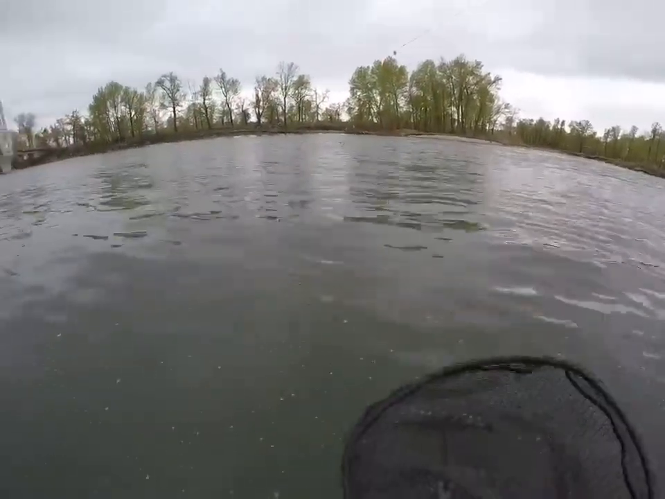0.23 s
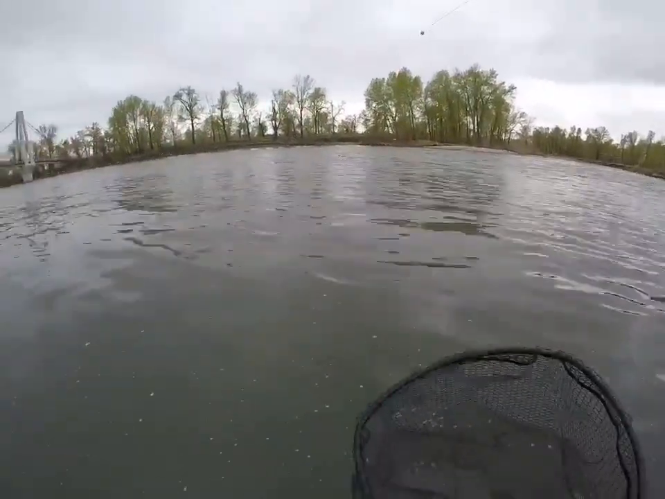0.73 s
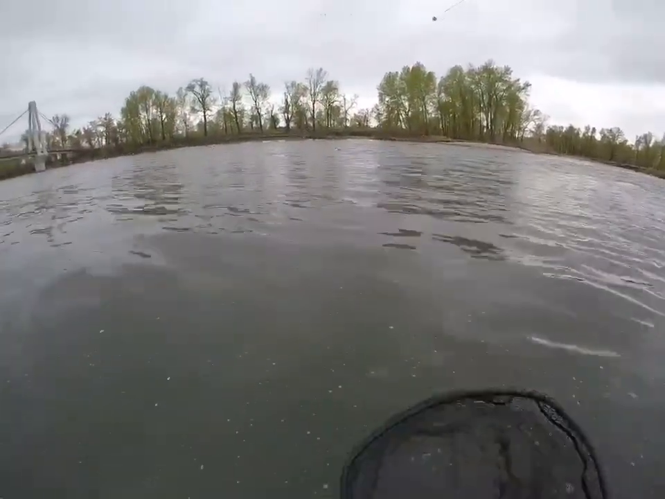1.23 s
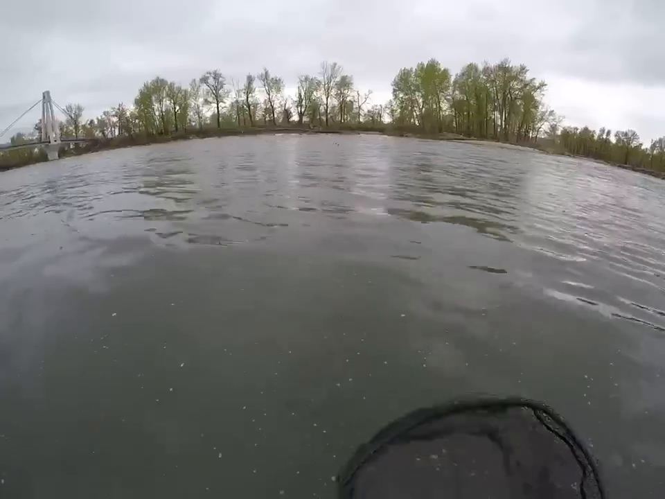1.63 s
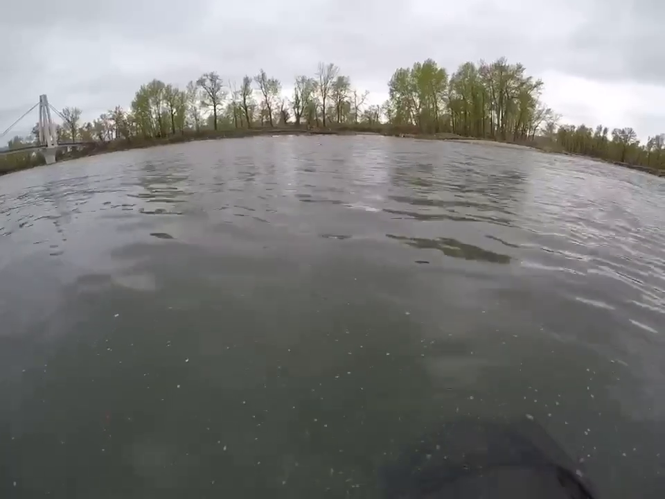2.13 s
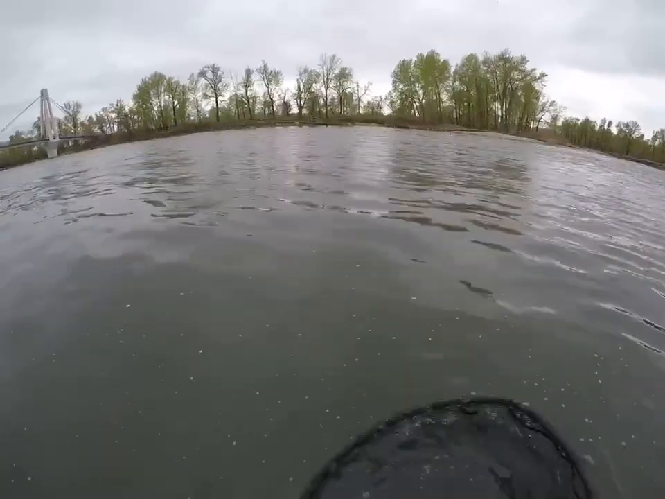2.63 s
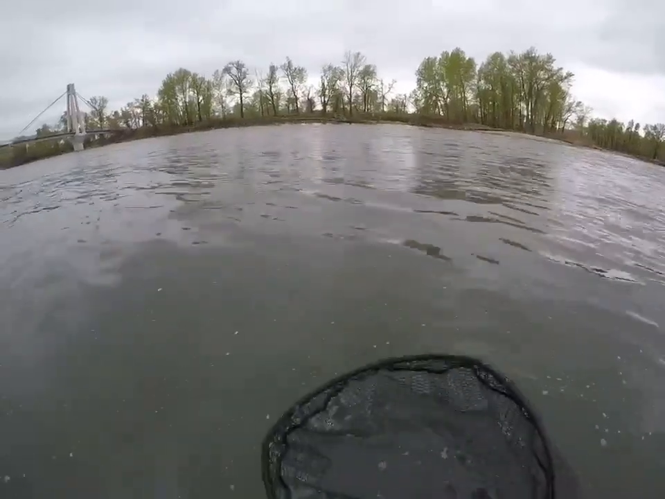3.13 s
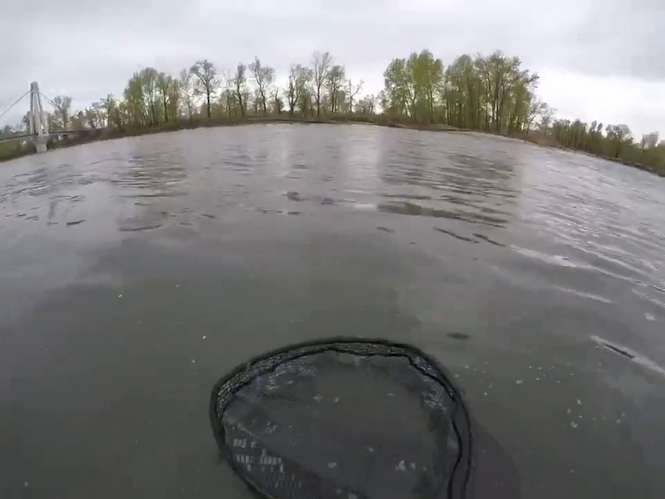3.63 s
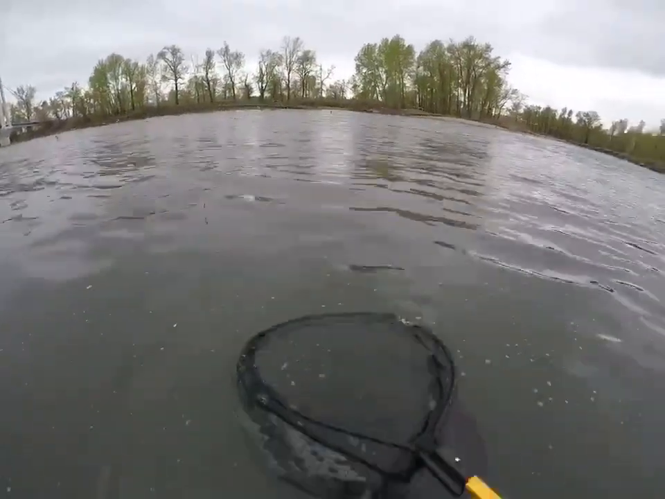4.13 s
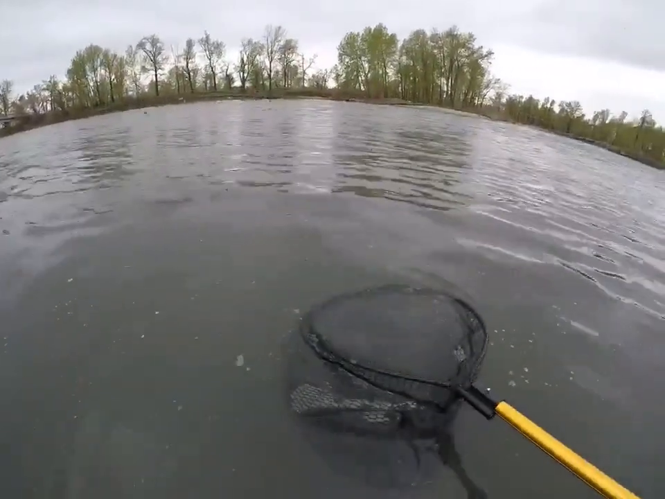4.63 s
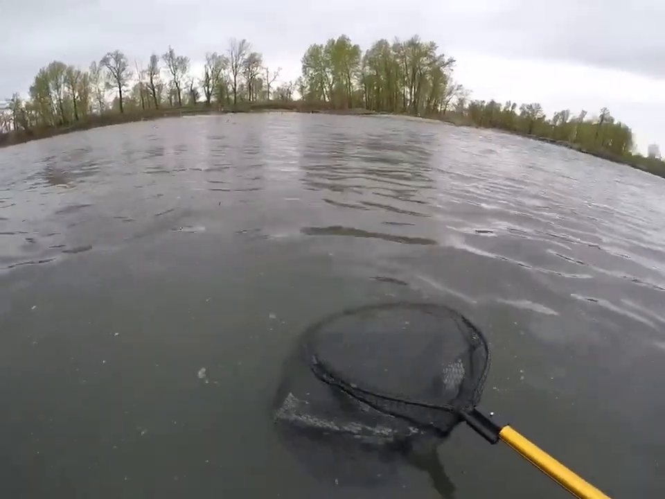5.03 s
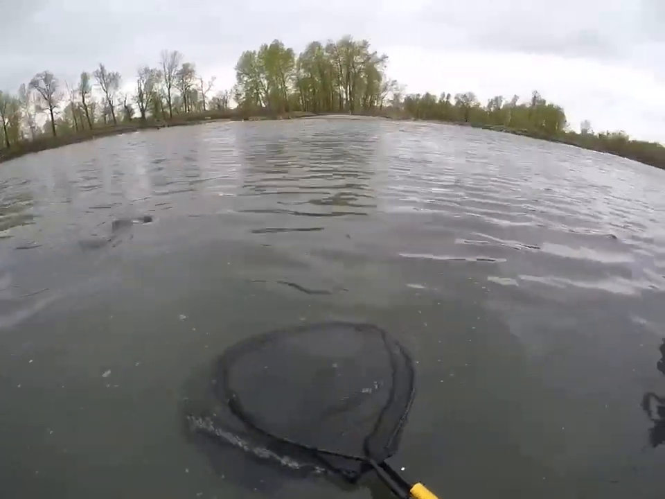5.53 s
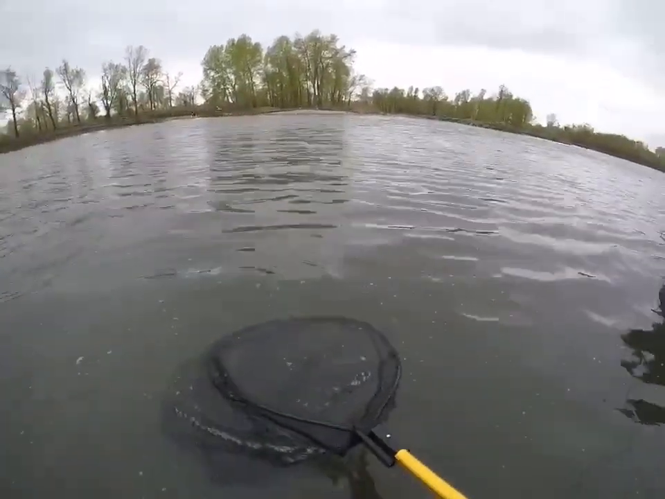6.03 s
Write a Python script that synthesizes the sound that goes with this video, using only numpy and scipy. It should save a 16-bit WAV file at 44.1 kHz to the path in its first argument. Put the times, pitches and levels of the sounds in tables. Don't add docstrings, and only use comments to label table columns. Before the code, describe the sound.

Close microphone in a plastic case beside a wet landing net on open water. Gulls overhead squeal in short overlapping glides, jumping from lower to higher voice, with distant birds blurred by echoes from the wooded bank. Small drips and net rustles tick nearby. One dull double knock with clicks and a short slosh interrupts a brief gap before the chorus returns and fades to scattered calls.

```python
import sys
import numpy as np
from scipy import signal
from scipy.io import wavfile
from scipy.ndimage import uniform_filter1d

SR = 44100
rng = np.random.default_rng(int(sys.argv[2]) if len(sys.argv) > 2 else 0)


def how_loud(loudness_db):
    steps = np.asarray(loudness_db, float) / 20
    return 10 ** steps


def pcm_store(signal):
    levels = np.round(np.clip(np.atleast_2d(signal), -1, 1) * 32767)
    wavfile.write(sys.argv[1], SR, levels.astype(np.int16).T)


N = 276948


def evened(x):
    return x / np.sqrt(np.mean(x ** 2) + 1e-20)


def read(points, hz):
    f, value = np.transpose(points)
    return np.interp(np.log(hz + 1), np.log(f + 1), value)


def add(mix, s, sound):
    part = mix[round(s * SR):][:len(sound)]
    part += sound[:len(part)]


def band_of(x, order, low_hz, high_hz):
    return signal.sosfilt(signal.butter(order, [low_hz, high_hz], "bandpass", fs=SR, output="sos"), x)


def swells(rest_db, rows):
    t = np.arange(N) / SR
    rise_db = sum(db * np.exp(-(2 * (t - s) / length) ** 2) for s, length, db in rows)
    return how_loud(rest_db + rise_db)


def wander(count, seconds):
    span = max(int(seconds * SR), 1)
    once = uniform_filter1d(rng.standard_normal(count), span)
    return evened(uniform_filter1d(once, span))


def noise(shape_db, patchy_db):
    frames, hz = N // 512 + 5, np.fft.rfftfreq(2048, 1 / SR)
    a, b, patches = rng.standard_normal((frames, 1025, 3)).T
    patches = uniform_filter1d(patches, size=20, axis=0)
    patches = evened(uniform_filter1d(patches, size=6, axis=1))
    z = (a + 1j * b) * how_loud(shape_db(hz)[:, None] + patchy_db * patches)
    return evened(signal.istft(z, nperseg=2048, noverlap=1536)[1][:N])


def grains(share):
    force = how_loud(4.5 * np.minimum(rng.exponential(1, N), 5))
    return force * rng.standard_normal(N) * (rng.random(N) < share)


def burst(rows, low_hz, high_hz):
    t, mix = np.arange(8000) / SR, np.zeros(N)
    for s, db, t60 in rows:
        puff = evened(band_of(rng.standard_normal(len(t)), 1, low_hz, high_hz))
        add(mix, s, how_loud(db - 60 * t / t60) * puff)
    return mix


def river():
    # freq_hz, level_db (per Hz)
    river_colour = [(40, -27.5), (112, -34), (128, -50), (155, 0.5), (220, -10), (450, -12), (900, -14),
                    (2000, -17.5), (3800, -23), (4800, -31.5), (6200, -30.5), (10000, -38.5), (15000, -66)]
    # middle_s, length_s, rise_db
    gusts = [
        (3.6, 0.2, 9.5),
        (6.26, .05, 8),
        (4.24, 0.22, 11),
        (5.2, 2.7, 4.4),
    ]

    def hum_db(hz):
        return -np.maximum(230 * np.log2(140 / (hz + 1)), 9 * np.log2((hz + 1) / 140))

    wash = noise(lambda hz: read(river_colour, hz), patchy_db=2.0)
    stir = noise(hum_db, patchy_db=2.0)
    return how_loud(-44.5) * wash + swells(-53.5, gusts) * stir


def netting():
    # middle_s, length_s, rise_db
    shakes = [
        (.09, 0.083, 5.5),
        (1.7, 0.16, 16),
        (5.45, 0.1, 6.4),
    ]
    return swells(-74, shakes) * evened(band_of(grains(.6), 2, 10500, 14500))


def splash():
    # middle_s, length_s, rise_db
    splashes = [
        (.08, 0.19, 22),
        (4.2, 0.13, 5),
        (5.5, 0.087, 10),
    ]
    return swells(-71, splashes) * evened(band_of(grains(.4), 2, 2500, 7000))


def ticks():
    # start_s, peak_db, pitch_hz
    drips = [(.066, -25, 685), (.098, -47, 12500), (.127, -37, 4440), (1.77, -28, 795), (4.106, -21, 406),
             (4.116, -21, 1300), (4.117, -30, 4160), (5.834, -44, 6470), (1.74, -34, 4960),
             (4.1465, -25, 1730), (4.157, -30, 444), (4.18, -35.5, 3850), (4.238, -50, 5900),
             (4.281, -51, 5530), (4.362, -37, 4860), (5.875, -32, 640), (.089, -43, 5900), (.11, -43, 5300),
             (.17, -45, 5800), (.19, -46, 6300), (5.51, -36, 4370), (5.567, -42, 2500),
             (5.868, -36.5, 6300), (5.868, -38, 4916)]
    mix, t = np.zeros(N), np.arange(3000) / SR
    for s, db, hz in drips:
        t60 = 0.0086 + 18 / hz
        onset = np.minimum(t * hz, 1)
        add(mix, s, how_loud(db - 60 * t / t60) * np.sin(2 * np.pi * hz * t) * onset)
    return mix


def slosh():
    # start_s, peak_db, t60_s
    slaps = [
        (4.103, -33, 0.18),
        (4.17, -42.5, 0.21),
    ]
    return burst(slaps, 420, 560)


def snaps():
    # start_s, peak_db, t60_s
    clicks = [
        (4.1165, -50, 0.0055),
        (4.181, -52, 0.011),
        (5.481, -52, .006),
        (5.493, -53, .006),
        (5.509, -50, .01),
        (5.567, -50, .006),
        (6.276, -49, .01),
    ]
    return burst(clicks, 3000, 11000)


def knock():
    # start_s, peak_db, start_hz, end_hz, rise_s, fall_s
    swings = [
        (4.1065, -11.5, 185, 165, .004, .006),
        (4.1135, -11, 185, 165, .003, .008),
    ]
    mix, t = np.zeros(N), np.arange(4000) / SR
    for s, db, start_hz, end_hz, rise, fall in swings:
        hz = end_hz + (start_hz - end_hz) * np.exp(-t / fall)
        swing = np.sin(2 * np.pi * np.cumsum(hz) / SR)
        add(mix, s, how_loud(db) * swing * (1 - np.exp(-t / rise)) * np.exp(-(t / fall) ** 2 / 2))
    return mix


def handling():
    low_cut = signal.butter(14, 128, "highpass", fs=SR, output="sos")
    return signal.sosfilt(low_cut, ticks() + knock() + slosh() + snaps())


def cry(start_db, end_db, bright_db, mouth_hz, path):
    # freq_hz, level_db
    throat = [(700, -3.5), (1100, 2), (1900, 4), (2900, 0), (4000, -3), (4900, -12), (6000, -10.5),
              (7500, -22), (10500, -28), (13000, -48), (15500, -69)]
    edge = .008
    s, hz = np.transpose(path)
    t = np.arange(s[0] - edge / 2, s[-1] + edge / 2, 1 / SR)
    hz = uniform_filter1d(np.interp(t, s, hz), size=600, mode="nearest")
    hz = hz * (1 + .007 * wander(len(t), .009))

    order = np.arange(1, 14)[:, None]
    mouth_db = 9 * np.exp(-(np.log2(order * hz / mouth_hz) / 0.18) ** 2 / 2)
    slope_db = min(bright_db, 5) * np.log2(np.minimum(order, 4))
    top_db = -2.5 * np.clip(order - 3, 0, 2)
    gains = how_loud(read(throat, order * hz) + slope_db + mouth_db + top_db) * (order * hz < 16000)
    gains = gains / np.sqrt((gains ** 2).sum(0) / 2)

    flutter_db = 2.6 * (0.74 + .15 * np.minimum(order, 6))
    gains = gains * how_loud(flutter_db * np.array([wander(len(t), 0.0055) for _ in order]))
    phase = order * 2 * np.pi * np.cumsum(hz) / SR + 2 * np.pi * rng.random(order.shape)
    voice = (gains * np.cos(phase)).sum(0)
    voice = voice * (1 + .04 * wander(len(t), 0.00045))
    fade = np.clip(np.minimum(t - t[0], t[-1] - t) / edge, 0, 1)
    return max(t[0], 0), voice * how_loud(np.linspace(start_db, end_db, len(t))) * fade


def far_flock(count=70):
    mix = np.zeros(N)
    for place, pitch, length, size in rng.random((count, 4)):
        s, hz, span, db = place * N / SR, 950 + 250 * pitch, .07 + .08 * length, -9 * size
        low_path = [(s, hz), (s + span, 1.6 * hz)]
        high_path = [(s + span, 2.0 * hz), (s + 1.6 * span, 1.7 * hz), (s + 2.3 * span, 1.1 * hz)]
        add(mix, *cry(db, db, 0.12, 3200, low_path))
        add(mix, *cry(db, db, 3.7, 2210, high_path))
    return mix / np.sqrt(uniform_filter1d(mix ** 2, size=12000) + 0.026)


def banks(x, t60):
    taps = np.zeros(SR)
    at = np.arange(300, SR - 20, 20)
    taps[at + rng.integers(0, 20, len(at))] = rng.choice([-1., 1.], len(at))
    taps = taps * how_loud(-60 * np.arange(SR) / SR / t60)
    return signal.fftconvolve(x, taps / np.linalg.norm(taps))[:N]


def haze():
    # time_s, level_db
    flock_level = [(0., -100), (.5, -45), (.85, -29.5), (1.25, -36), (1.7, -35), (2.15, -44.5), (3., -44.5),
                   (3.3, -45.5), (3.8, -34), (4.14, -48.5), (4.4, -78), (4.65, -33.5), (5.1, -38.5),
                   (6.05, -56), (6.28, -34)]
    far = far_flock()
    level = how_loud(np.interp(np.arange(N) / SR, *np.transpose(flock_level)))
    return level * (how_loud(-8) * far + how_loud(-7) * banks(far, .45))


def voiced(start_db, end_db, path):
    effort_db = (start_db + end_db) / 2 + 38
    low = np.mean([hz for _, hz in path]) < 1480  # Hz, where the voice breaks
    bright_db, mouth_hz = (0.5, 3270) if low else (-4.5, 4850)
    bright_db += 0.2 * effort_db
    mouth_hz *= 2 ** (-2 * min(effort_db, 0))
    return cry(start_db, end_db, bright_db, mouth_hz, path)


def note(start, length, db, first_hz, last_hz, power=1, bow=0, hitch=0):
    u = np.linspace(0, 1, num=13)
    way = u ** power + hitch * np.sin(2 * np.pi * u) / (2 * np.pi)
    arch = 1 + bow * np.sqrt(length) * np.sin(np.pi * u ** 1.2)
    hz = (first_hz + (last_hz - first_hz) * way) * arch
    swell_db = 4.5 * np.log2(last_hz / first_hz) / 2
    return voiced(db - swell_db, db + swell_db, list(zip(start + length * u, hz)))


def short_cries():
    # start_s, length_s, level_db, first_hz, last_hz
    rises = [(0.609, 0.05, -38, 1670, 1780), (0.87, 0.054, -37, 1328, 1460),
             (1.894, 0.07, -39.5, 1054, 1038), (1.959, 0.094, -46, 1172, 1400),
             (3.108, 0.083, -35.5, 1023, 1473), (3.671, 0.063, -34.5, 958, 1410),
             (4.49, 0.069, -38.5, 1077, 1380), (4.639, 0.12, -39.5, 1910, 2170),
             (4.71, 0.091, -42, 1335, 1357), (4.629, 0.0205, -45, 1210, 1560),
             (5.148, 0.054, -36, 949, 1230), (6.238, 0.027, -41, 1488, 1620)]
    falls = [(0.742, 0.032, -33, 1480, 1385), (1.134, 0.071, -44, 1227, 913),
             (1.255, 0.063, -48, 1780, 1600), (2.79, 0.035, -47, 1407, 1220),
             (3.339, 0.057, -42, 1890, 1676), (3.823, 0.065, -34.5, 1798, 1715),
             (1.133, 0.084, -39, 1220, 1010), (2.545, 0.04, -49, 1840, 1700),
             (2.642, 0.052, -58, 2120, 1500), (4.597, 0.05, -41.5, 1617, 1213),
             (4.59, .11, -37, 1838, 1458), (5.086, 0.035, -43, 2125, 1595), (5.173, 0.053, -35, 1990, 1880),
             (5.405, 0.061, -42.5, 997, 787)]
    swoops = [
        (1.703, .054, -37, 1777, 1543),
        (2.77, 0.18, -41.5, 1667, 1550),
        (3.547, 0.047, -41, 1950, 1690),
        (4.684, 0.11, -38.5, 1074, 1460),
        (6.209, 0.069, -38.5, 1485, 1610),
    ]
    leaps = [
        (.545, 0.042, -44.5, 1200, 1300),
        (1.6, 0.046, -36.5, 2400, 1780),
        (1.7, 0.14, -43, 310, 660),
        (6.035, 0.0184, -43.5, 720, 850),
        (4.791, 0.15, -38.5, 1770, 1560),
    ]
    arches = [
        (1.488, 0.089, -45, 1310, 1230),
        (3.377, 0.19, -35.5, 1709, 1570),
        (3.764, 0.069, -35.5, 2100, 1740),
        (6.183, .099, -36.5, 1847, 1723),
    ]
    cries = [note(*row, hitch=0.58) for row in rises]
    cries += [note(*row) for row in falls]
    cries += [note(*row, power=2.2) for row in swoops]
    cries += [note(*row, power=.62) for row in leaps]
    return cries + [note(*row, bow=.34) for row in arches]


def long_cries():
    # start_db, end_db, bright_db (per octave), mouth_hz, path (time_s, pitch_hz)
    waking = [
        (-48, -46, -5.5, 3650, [(.03, 2000), (.05, 1870), (.105, 1807)]),
        (-50, -49, 3, 1350, [(.105, 1236), (.15, 1395), (.165, 1500)]),
        (-44.5, -46, -2.5, 1680, [(.165, 797), (.26, 875), (.288, 847)]),
        (-47, -42.5, -2, 3400, [(.293, 842), (.32, 940), (.335, 1143), (.352, 1390)]),
        (-53, -45, -2, 2900, [(.42, 986), (.48, 1090), (.53, 1212), (.548, 1280)]),
    ]
    low_winding = [
        (-31, -31.5, 3, 3160, [(.601, 950), (.609, 1090), (.632, 1123), (.675, 1005), (.76, 1326), (.787, 1516)]),
        (-36, -33, 3.5, 3160, [(1.8, 1007), (1.825, 1096), (1.86, 1047), (1.9, 1143), (1.92, 1494)]),
        (-41, -33.5, 3.5, 2750, [(3.7, 805), (3.762, 1099), (3.804, 1228), (3.826, 1385), (3.85, 1380), (3.868, 1070)]),
        (-37, -34, -2, 2920, [(4.312, 736), (4.316, 826), (4.34, 942), (4.379, 945), (4.495, 1142), (4.517, 1356)]),
        (-42.5, -35.5, -2.5, 3040, [(6.049, 915), (6.07, 968), (6.2, 1052), (6.225, 1134), (6.24, 1330)]),
    ]
    high_winding = [
        (-48, -39, -6, 4300, [(.35, 1737), (.366, 1810), (.378, 1970), (.509, 1802), (.539, 1630)]),
        (-27.5, -32, 1.5, 1800, [(.778, 1795), (.82, 1600), (.865, 1504)]),
        (-36, -35, 3.5, 1510, [(1.43, 1745), (1.49, 1796), (1.525, 1850), (1.56, 1780), (1.602, 1685)]),
        (-31, -35, -1.5, 4000, [(3.098, 2090), (3.131, 1946), (3.164, 1982), (3.182, 2174), (3.221, 2150), (3.263, 1803), (3.281, 1830)]),
        (-39, -33.5, 3, 1380, [(3.191, 1827), (3.24, 1990), (3.299, 1907), (3.364, 1663), (3.451, 1470)]),
        (-35.5, -31, 1.5, 1520, [(4.46, 1321), (4.475, 1480), (4.5, 1550), (4.535, 1684), (4.555, 1544), (4.57, 1410), (4.59, 1406)]),
        (-32, -31, 1, 1610, [(4.78, 2035), (4.83, 1915), (4.86, 1966), (4.905, 2150), (4.925, 2105), (4.955, 1866), (4.99, 1865)]),
        (-42, -40.5, -0.5, 5700, [(5.222, 1705), (5.346, 1882), (5.409, 1620)]),
    ]
    faint_winding = [(-50, -48, 0, 2400, [(2.19, 813), (2.27, 867), (2.29, 960), (2.33, 1050),
                     (2.362, 930)]), (-58, -44, -7, 3400, [(2.22, 1108), (2.3, 1115), (2.34, 1150),
                     (2.4, 1298), (2.422, 1300), (2.446, 1116)]), (-44, -57, -1, 2900, [(2.19, 1436),
                     (2.23, 1490), (2.29, 1413), (2.33, 1400)]), (-47, -40, -1.5, 2000, [(2.45, 719),
                     (2.47, 859), (2.52, 1066), (2.54, 1240), (2.58, 1294), (2.61, 1266), (2.645, 1124)]),
                     (-53, -51, -3, 1800, [(2.49, 1480), (2.52, 1890), (2.546, 1600)]),
                     (-44.5, -40.5, -8.5, 2700, [(2.65, 1087), (2.675, 1272), (2.75, 1320), (2.775, 1390)]),
                     (-50, -51, 6, 2300, [(2.35, 1085), (2.38, 1134), (2.45, 1134), (2.5, 1170)]),
                     (-46, -47, 5, 2600, [(2.148, 1130), (2.17, 1020), (2.19, 800)]),
                     (-41, -40, 0.5, 1800, [(2.045, 1920), (2.1, 2060), (2.125, 1950), (2.147, 1750)]),
                     (-42.5, -45, -6.5, 2360, [(3.885, 1228), (3.95, 1303), (4.0, 1280), (4.058, 1084)])]
    hooks = [(-42, -33.5, -2.5, 3400, [(.555, 1045), (.575, 1145), (.6, 1283), (.616, 1334)]),
             (-35.5, -33, 2.5, 2960, [(1.352, 928), (1.38, 1020), (1.41, 1200), (1.433, 1350)]),
             (-46, -35, 2.5, 5660, [(1.55, 967), (1.61, 1025), (1.65, 1062), (1.69, 1158), (1.7, 1256),
             (1.711, 1410)]), (-33.5, -28, 3, 3400, [(.972, 1005), (1.005, 1168), (1.025, 1264),
             (1.042, 1560)]), (-41, -44, 5, 2450, [(.87, 1180), (.97, 1252), (1.0, 1350)]),
             (-33.5, -34.5, 1, 3950, [(1.02, 1142), (1.07, 1180), (1.12, 1280), (1.15, 1265),
             (1.18, 1120)]), (-37.5, -35.5, 1.5, 2300, [(1.045, 1303), (1.1, 1282), (1.15, 1332),
             (1.195, 1370)]), (-32.5, -30.5, 4.5, 3500, [(1.755, 985), (1.77, 1157), (1.8, 1266),
             (1.81, 1500), (1.826, 1590)]), (-46, -35.5, 1.5, 2500, [(1.95, 1085), (2.0, 1123),
             (2.02, 1197), (2.03, 1410), (2.04, 1197), (2.056, 1000)]),
             (-36.5, -38, 6, 2760, [(4.415, 1207), (4.44, 1150), (4.456, 1260), (4.476, 1450)]),
             (-32, -42, 3, 2900, [(4.585, 1007), (4.61, 1076), (4.64, 1132), (4.66, 1090)]),
             (-33, -22.5, -0.5, 3340, [(4.74, 1002), (4.752, 1185), (4.765, 1470), (4.782, 1530)]),
             (-36.5, -37.5, 5.9, 3040, [(4.785, 1027), (4.83, 947), (4.86, 980), (4.895, 1040)]),
             (-40.5, -40.5, 1.5, 4140, [(4.87, 1100), (4.94, 1180), (4.99, 1190), (5.015, 1236),
             (5.03, 1480), (5.06, 1546), (5.1, 1380)]), (-41.5, -35.5, 3, 3100, [(5.035, 1061),
             (5.08, 1152), (5.14, 1244), (5.176, 1400)])]
    tumbles = [
        (-38, -31, 2.5, 4600, [(3.635, 1997), (3.67, 2023), (3.72, 2128), (3.74, 2037), (3.76, 1806), (3.785, 1746)]),
        (-44, -53, 3, 2100, [(5.405, 2100), (5.42, 1844), (5.45, 1740), (5.482, 1426)]),
        (-45.5, -38.5, -4.5, 4200, [(5.668, 1963), (5.695, 1990), (5.72, 1880), (5.746, 1680)]),
        (-39, -48, 3, 2100, [(.81, 2100), (.85, 1990), (.92, 2120)]),
        (-32.5, -37.5, -1.5, 4200, [(1.82, 2198), (1.855, 2230), (1.885, 1995), (1.905, 1817), (1.94, 1680)]),
        (-37.5, -41.5, 0, 3100, [(1.915, 1887), (1.94, 2125), (1.97, 2202), (2.0, 1964), (2.03, 1930), (2.05, 1620), (2.08, 1505), (2.106, 1390)]),
        (-31.5, -36.5, -3, 1800, [(4.515, 2080), (4.535, 2070), (4.56, 1880), (4.577, 1680)]),
        (-39, -32.5, 12, 3600, [(4.94, 2000), (4.98, 1800), (5.01, 1575), (5.026, 1220)]),
    ]
    scattered = [(-41.5, -37.5, 0.5, 3100, [(.855, 1730), (.87, 1782), (.95, 1843), (1.04, 1910)]),
                 (-27.5, -33, -1, 1600, [(1.043, 1960), (1.085, 2090), (1.115, 2030), (1.156, 1724)]),
                 (-44, -44, -2, 1600, [(1.055, 1650), (1.12, 1520), (1.19, 1390)]),
                 (-40, -36.5, 1.5, 3570, [(2.8, 986), (2.86, 1204), (2.92, 1303), (2.948, 1520)]),
                 (-47, -32, 2, 3300, [(3.052, 1028), (3.066, 1170)]), (-41, -40, 0, 2600, [(.955, 847),
                 (.975, 960)]), (-32.5, -35, 3, 3120, [(3.297, 862), (3.31, 950), (3.34, 1130), (3.385, 1307)]),
                 (-33, -35.5, 3.5, 3600, [(3.535, 975), (3.56, 1196), (3.6, 1390), (3.635, 1533)]),
                 (-38, -42, 1, 3400, [(4.935, 1060), (4.96, 1180)]), (-43, -44, -2, 3000, [(4.65, 1090),
                 (4.68, 1052), (4.73, 1132)]),
                 (-42, -43, 5, 2900, [(.68, 1495), (.71, 1460), (.736, 1340)]),
             (-32.5, -25, -4.5, 2540, [(4.495, 1150), (4.51, 1300), (4.52, 1400)]),
             (-38, -35.5, 0, 3540, [(1.44, 1035), (1.5, 1148), (1.53, 1166), (1.567, 1250)]),
             (-27, -36, 3.5, 3730, [(3.067, 1160), (3.077, 1300), (3.09, 1540), (3.1, 1590),
             (3.108, 1500)]), (-48, -33.5, 5, 3200, [(3.105, 1045), (3.131, 973), (3.164, 986),
             (3.192, 1087)]), (-40.5, -43, 5.5, 2100, [(2.966, 1360), (3.0, 1150), (3.035, 1020),
             (3.062, 820)]), (-49, -50, 1, 3250, [(3.4, 1070), (3.52, 1105)]),
             (-36, -48, 2.5, 2500, [(5.22, 1230), (5.235, 1150), (5.28, 1030), (5.31, 830)]),
             (-42.5, -36.5, 1, 3300, [(5.572, 930), (5.6, 1120), (5.64, 1230), (5.655, 1400),
             (5.672, 1480)]), (-41.5, -43, 5, 2700, [(5.645, 935), (5.69, 1000), (5.726, 950)]),
             (-36, -33.5, 3, 3040, [(6.097, 850), (6.11, 1000), (6.135, 1150), (6.155, 1250), (6.165, 1400),
             (6.186, 1500)]), (-41.5, -39, 0, 1200, [(6.09, 1050), (6.115, 1220), (6.2, 1230)])]
    rows = low_winding + high_winding + faint_winding + hooks + waking + scattered + tumbles
    return [cry(*row) for row in rows]


def gulls():
    mix = np.zeros(N)
    for s, sound in short_cries() + long_cries():
        add(mix, s, sound)
    return mix


def treble(x):
    # middle_s, length_s, rise_db
    facing = [
        (0.753, 0.95, 19.5),
        (1.068, 0.048, 6),
        (1.6, 0.42, 23.5),
        (4.47, 0.15, 24),
        (5.295, 0.7, 12),
        (6.215, 0.7, 28.5),
    ]
    # middle_s, length_s, rise_db
    overhead = [
        (1.047, 0.22, 33),
        (1.788, 0.087, 40),
        (3.07, 0.06, 15),
        (3.187, 0.32, 36.5),
        (3.59, 0.09, 38),
        (4.484, .1, 36),
    ]
    shine = band_of(x, 2, 5400, 9200)
    sheen = band_of(x, 4, 11800, 14600)
    return x + swells(-18.5, facing) * shine + swells(-16.0, overhead) * sheen


def scene():
    near = treble(gulls())
    echoes = how_loud(-17) * banks(near, .45)
    return (near + echoes + haze() + river() + netting() + splash() + handling())[None]


def band_limit(x):
    return signal.sosfilt(signal.butter(12, 15160, fs=SR, output="sos"), x)


def record(dry):
    return band_limit(dry)


dry = scene()
out = record(dry)
pcm_store(out)
```